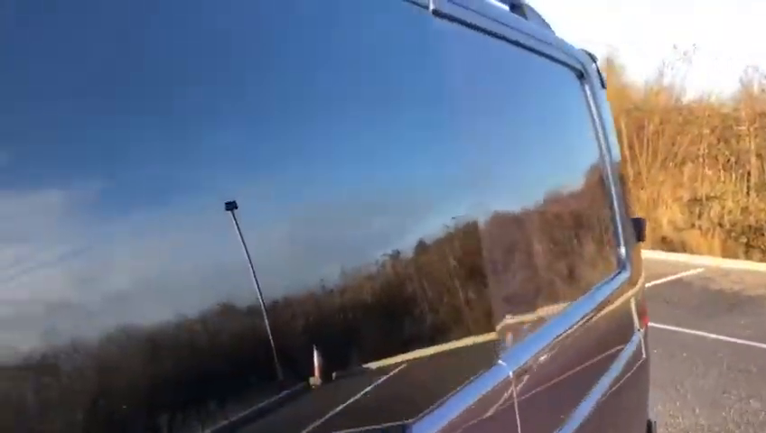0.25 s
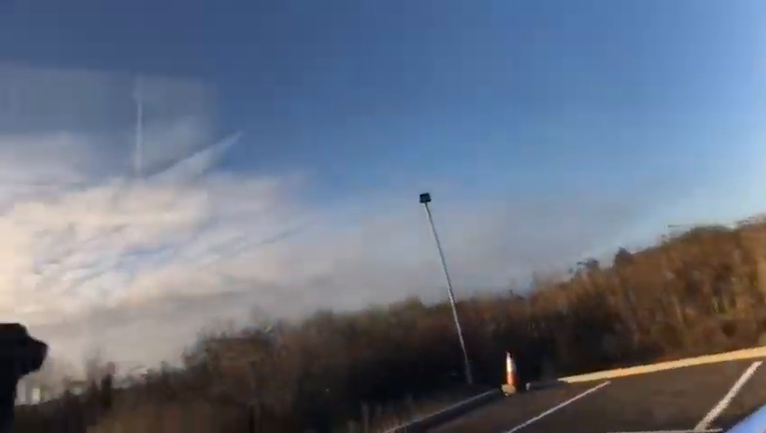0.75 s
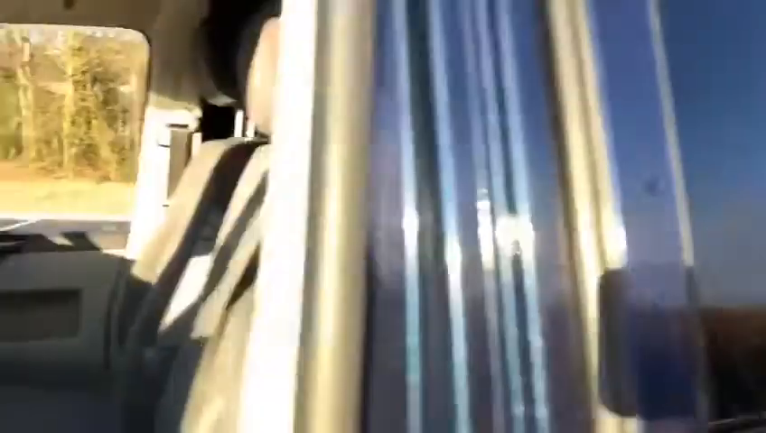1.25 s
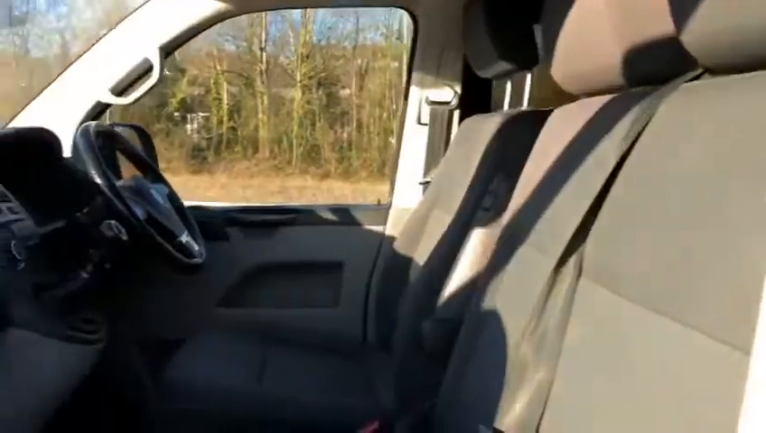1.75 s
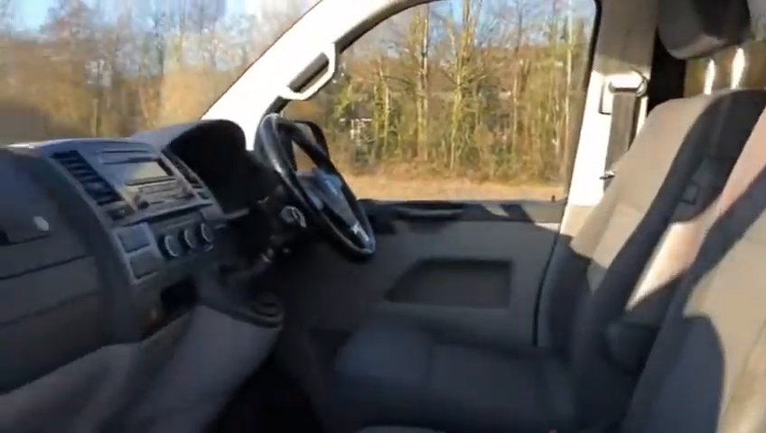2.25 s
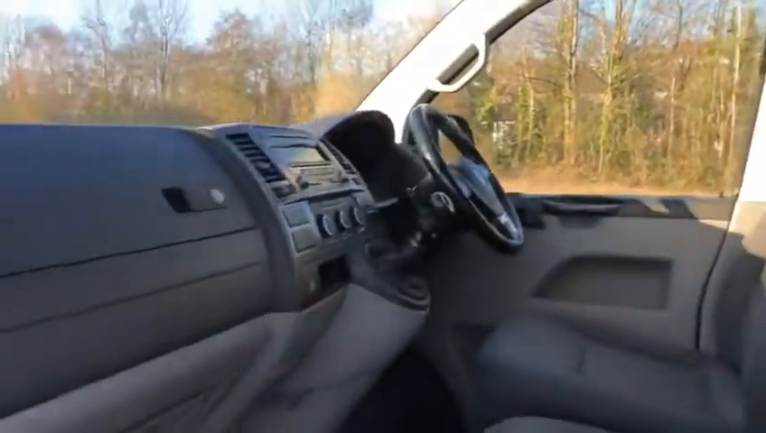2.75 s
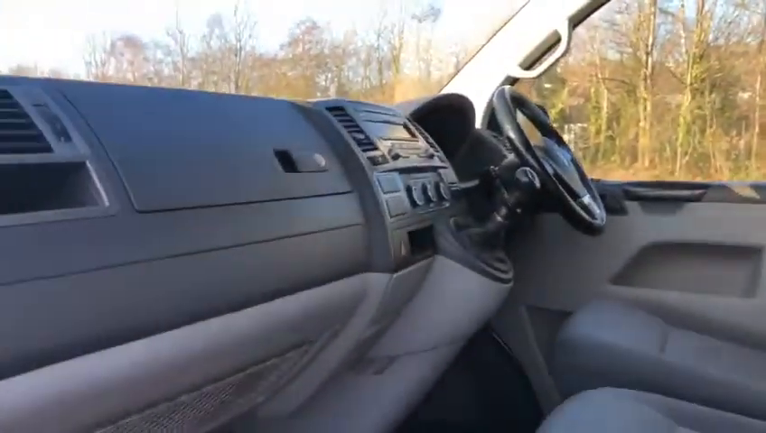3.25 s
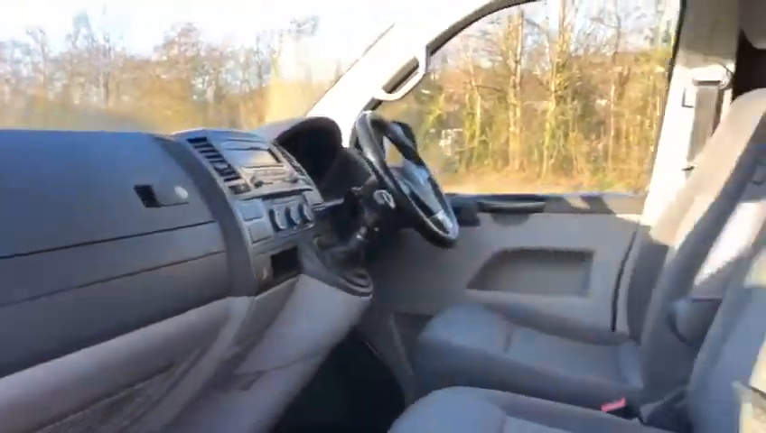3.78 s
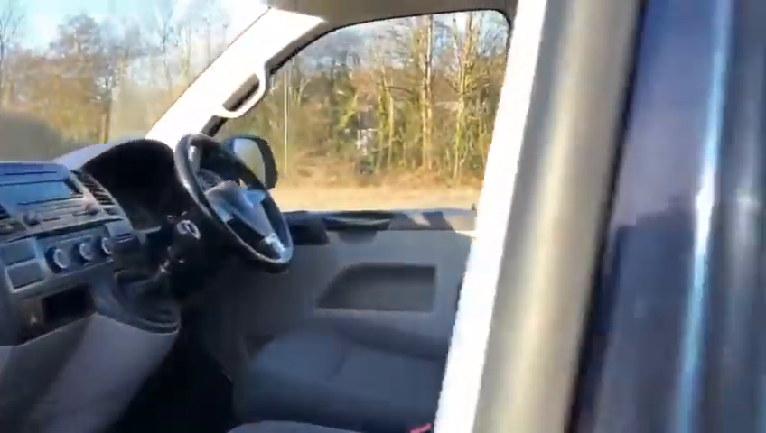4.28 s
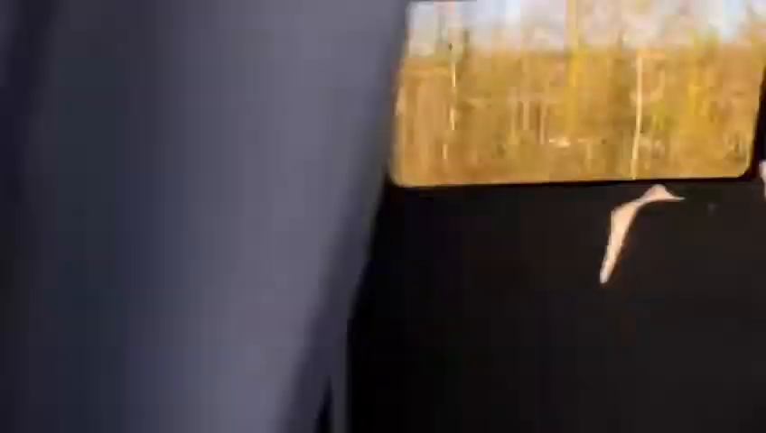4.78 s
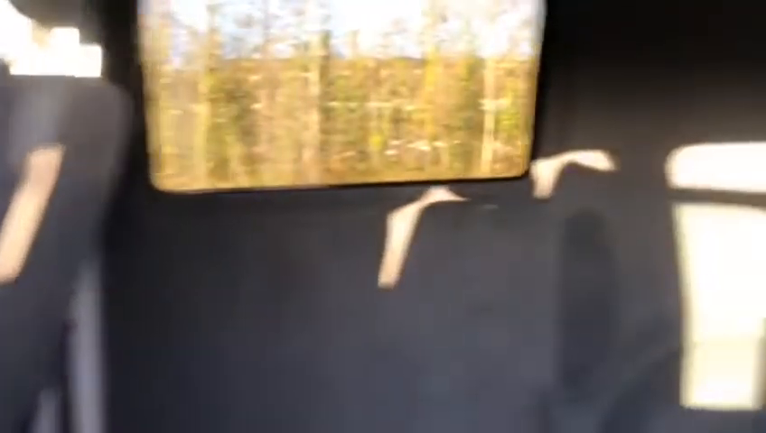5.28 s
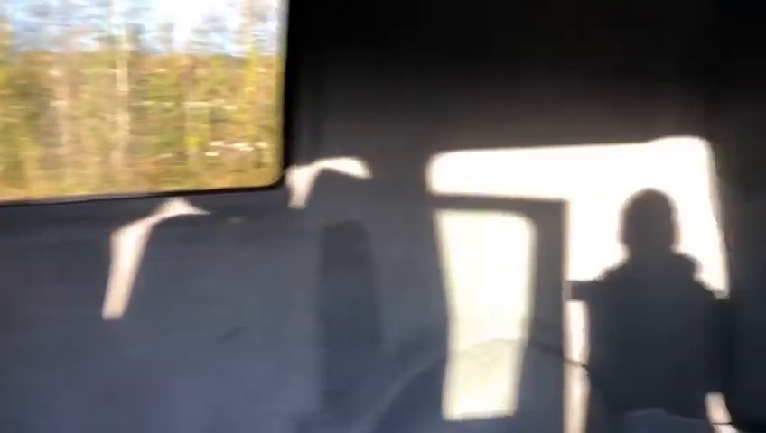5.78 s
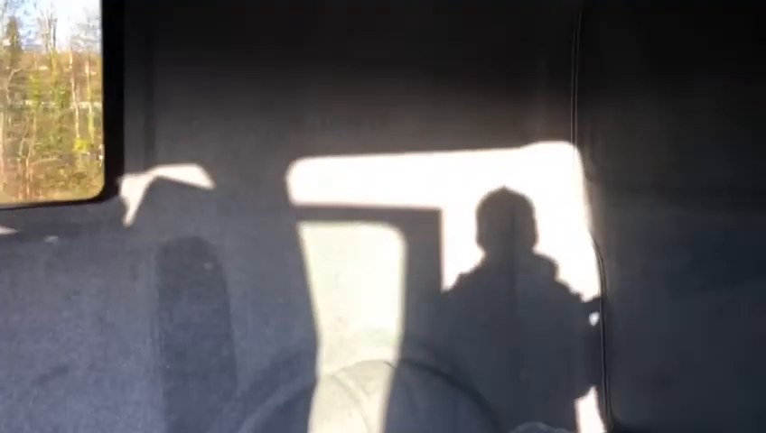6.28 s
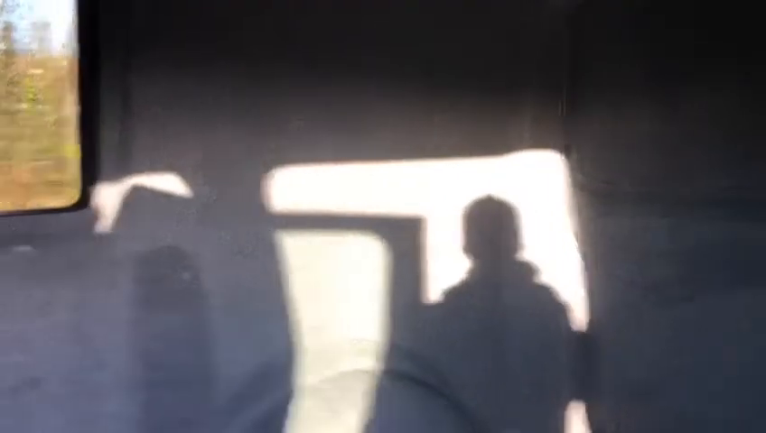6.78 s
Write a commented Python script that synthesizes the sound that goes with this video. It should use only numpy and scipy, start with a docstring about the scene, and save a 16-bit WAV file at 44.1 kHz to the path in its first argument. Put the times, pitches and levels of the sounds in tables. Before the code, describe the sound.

Close up in a quiet car park with faint traffic and breeze, a van's cab door catch cracks open with a short metallic ring. Small taps, tiny squeaks and cloth rustles follow. Then the sliding side door unlatches with a heavy multi-part clunk and rolls back, rumbling through steel and booming in the hollow body, with squeals and rattles before it slows to a stop.

```python
"""A van in a quiet car park, heard close up over shaped noise for far traffic and a light breeze.
First the cab door's catch cracks open and rings its lock and panel; light taps, dry squeals and
jacket rustles of rubbed-cloth noise follow. Then the sliding side door unlatches with a heavy clunk of
noise bursts and damped modes, and rolls back: uneven noise that follows the door's speed rumbles through
the steel and drums the hollow body, with rattles and gliding chirps, until the door slows to a stop."""
import sys
import numpy as np
from scipy import signal
from scipy.fft import rfft, irfft, next_fast_len
from scipy.io import wavfile
from scipy.ndimage import uniform_filter1d, map_coordinates

SR = 44100
rng = np.random.default_rng(int(sys.argv[2]) if len(sys.argv) > 2 else 0)


def digitize_waveform(pressure):
    """Quantize a signal to 16-bit integers and store it at the path in sys.argv[1].

    Rows of a 2-D input are taken as channels; values are limited to [-1, 1].
    """
    field = np.atleast_2d(pressure).T
    bounded = np.clip(field, -1, 1)
    quanta = np.round(bounded * 32767).astype(np.int16)
    wavfile.write(sys.argv[1], SR, quanta)


N = 310023  # length in samples

# In every table level_db is relative: the function that plays it adds its own envelope, colour and gain.


def amp(db):
    """Decibels to gain."""
    return 10 ** (np.asarray(db) / 20)


def unit(x):
    """Scale to rms 1."""
    return x / np.sqrt(np.mean(x ** 2) + 1e-20)


def along(points, hz):
    """Read (Hz, value) points on a log frequency axis."""
    f, v = np.transpose(points)
    return np.interp(np.log(hz + 1), np.log(f + 1), v)


def wobble(rate, size=N):
    """A smooth random curve with this many knots a second."""
    knots = rng.standard_normal(int(size * rate / SR) + 4)
    return map_coordinates(knots, [np.arange(size) * rate / SR])


def filtered(x, response):
    """Pass x through a response given as a function of frequency."""
    padded = next_fast_len(len(x) + SR // 4)
    spectrum = rfft(x, padded) * response(np.fft.rfftfreq(padded, 1 / SR))
    return irfft(spectrum, padded)[:len(x)]


def coloured(x, spectrum):
    """Shape x with (Hz, dB) points, at rms 1."""
    return unit(filtered(x, lambda hz: amp(along(spectrum, hz))))


def rush(spectrum):
    """Steady noise of rms 1 with this spectrum."""
    return coloured(rng.standard_normal(N), spectrum)


def bumps(rate, depth_db):
    """Uneven contact force of surfaces that roll or rub: noise whose level wanders."""
    return rng.standard_normal(N) * amp(depth_db * wobble(rate))


def add(track, s, sound):
    """Mix a sound into the track at time s."""
    part = track[max(round(s * SR), 0):][:len(sound)]
    part += sound[:len(part)]


def swells(rows, attack_s, release_s, sag_db_per_s=0):
    """A gain per sample: each (start, length, dB) row rises, holds while sagging, and dies away."""
    t = np.arange(2 * SR) / SR
    out = np.zeros(N)
    for s, length, db in rows:
        rise = np.minimum(t / attack_s, 1)
        release = np.exp(-np.maximum(t - length, 0) / release_s)
        add(out, s, amp(db - sag_db_per_s * t) * rise * release)
    return out


def ring(modes, attack, spread_db):
    """Damped (Hz, dB, t60) modes of a struck part, with levels a little different every time."""
    t = np.arange(SR // 2) / SR
    tones = 0
    for hz, db, t60 in modes:
        tones += amp(db + spread_db * rng.normal() - 60 * t / t60) * np.sin(2 * np.pi * hz * t)
    return tones * (1 - np.exp(-t / attack))


def contact(colour, decay, attack, crack_t60, tail_db):
    """A blow on a part with countless modes: a short crack and a tail, each band dying at its own speed."""
    t = np.arange(SR // 3) / SR
    out = np.zeros(len(t))
    edges_hz = [200, 400, 800, 1300, 2000, 3800, 7000, 11000]
    for low, high in zip(edges_hz, edges_hz[1:]):
        centre = np.sqrt(low * high)
        band = signal.butter(3, [low, high], "band", fs=SR, output="sos")
        crack = amp(-60 * t / crack_t60)
        tail = amp(tail_db - 60 * t / along(decay, centre))
        fade = (crack + tail) * (1 - np.exp(-t / attack))
        burst = signal.sosfilt(band, fade * rng.standard_normal(len(t)))
        # every band gets the energy of its fade, whatever its width
        out += amp(along(colour, centre)) * burst * np.linalg.norm(fade) / np.linalg.norm(burst)
    return out


def contacts(rows, voicing, decay, attack, crack_t60, tail_db):
    """A series of blows on one part; voicing gives the (Hz, dB) of its knock, clack, tick and snap."""
    out = np.zeros(N)
    for s, tick, knock, clack, snap, *_ in rows:
        levels = (knock, clack, tick, snap)
        colour = [(hz, db + level) for (hz, db), level in zip(voicing, levels)]
        add(out, s, contact(colour, decay, attack, crack_t60, tail_db))
    return out


def with_clack(rows, clack_db):
    """Give each blow its clack, set against the mean of the low knock and the bright tick."""
    return [(s, tick, knock, (tick + knock) / 2 + clack_db, snap, hz) for s, tick, knock, snap, hz in rows]


PING_LOW_RATIO = 0.47  # the dull mode of a small steel part, over its main pitch


def pings(rows, t60, low_db):
    """A small steel part rings briefly: its own pitch, a duller mode below and brighter ones above."""
    out = np.zeros(N)
    for s, tick, _, clack, snap, hz in rows:
        modes = [(PING_LOW_RATIO * hz, clack + low_db, t60), (hz, tick - 2, t60)]
        modes += [(ratio * hz, snap, t60) for ratio in (1.97, 2.6, 3.3)]
        add(out, s, ring(modes, attack=0.00047, spread_db=5.0))
    return out


# spectra of far traffic and of the breeze: pitch_hz, level_db
ROAD_COLOUR = [(35, -36), (60, 1.5), (82, -26.5), (136, -11.5), (208, -15.5), (253, -12.5), (346, -19.5),
               (897, -21), (1430, -26), (1630, -30), (1740, -32.5), (2540, -40), (12000, -55.5),
               (15600, -78), (22000, -120)]
BREEZE_COLOUR = [(15, -16), (45, 2), (70, -7), (150, -9.5), (300, -32), (800, -23), (3000, -120)]
# puffs of breeze on the microphone: start_s, length_s, level_db
PUFFS = [(.38, 0.061, -46), (.66, 0.072, -45), (1.02, 0.064, -29)]
# swells of the thin, far hiss: start_s, length_s, level_db
HISS_SWELLS = [(.35, 0.49, -64.5), (6.3, 0.56, -68.5)]
TRAFFIC_DB, BREEZE_DB, HISS_DB = -45.5, -42, -76  # base levels before the fades and swells
SHELTER_DB_PER_S, BREEZE_EASES_DB_PER_S = 0.2, 0.9  # both fade as the microphone moves into the van
OUTSIDE_DB, OUTSIDE_S = 6, 0.72  # extra road at first, out in the open, and its time constant


def outdoors():
    """Far traffic and a thin hiss as filtered noise, under a low breeze that puffs and eases off."""
    t = np.arange(N) / SR
    road_db = TRAFFIC_DB + OUTSIDE_DB * np.exp(-t / OUTSIDE_S) - SHELTER_DB_PER_S * t
    road = amp(road_db + 0.19 * wobble(5)) * rush(ROAD_COLOUR)
    thin = rush([(1500, -36), (2900, -7.5), (3500, -2.0), (4200, -9), (5000, -23), (9000, -49.0)])
    hiss = (amp(HISS_DB) + swells(HISS_SWELLS, attack_s=0.22, release_s=0.059)) * thin
    breeze = amp(BREEZE_DB - BREEZE_EASES_DB_PER_S * t)
    breeze += swells(PUFFS, attack_s=0.052, release_s=0.11)
    return road + hiss + breeze * rush(BREEZE_COLOUR)


# sleeve movements: start_s, length_s, level_db
SLEEVES = [(1.04, 0.18, -53), (2.58, 0.14, -56.5), (2.66, 0.45, -55), (3.52, 0.23, -53), (4.2, 0.065, -57),
           (6.35, 0.096, -54), (6.5, 0.2, -62.5)]
# spectrum of rubbed cloth: pitch_hz, level_db
CLOTH_COLOUR = [(300, 5), (1200, 3), (2800, -2.5), (4500, -7.5), (9000, -14), (12000, -12)]


def jacket():
    """Sleeves brush against the coat: uneven friction noise swells at each movement."""
    rub = swells(SLEEVES, attack_s=0.038, release_s=0.03, sag_db_per_s=3)
    return amp(5.0) * rub * coloured(bumps(400, 1.2), CLOTH_COLOUR)


# hinge, handle and small knocks of hands on the van: start_s, tick_db, knock_db, snap_db, ring_hz
TAP_BLOWS = [(0.2144, -38, -55, -58, 2530), (0.403, -29, -43, -47.5, 2570), (0.4264, -31.5, -51, -54, 2560),
             (0.443, -28, -39, -45, 2050), (0.4562, -24.5, -60, -49.5, 3470),
             (0.473, -19.5, -43, -52, 2880), (0.735, -32.5, -40, -68, 1760), (1.2445, -37, -40, -52, 4800),
             (1.5855, -42.5, -35, -60, 1910), (1.6441, -26.5, -52, -57, 2300),
             (2.0658, -35.5, -52, -62.5, 2970), (2.5125, -39, -34.5, -54.5, 2930),
             (2.546, -31, -35, -59, 1940), (3.217, -40, -36.5, -54, 1940), (3.2552, -41.5, -46, -53, 1820),
             (3.2684, -39, -41, -48.5, 2890), (3.4692, -31, -29, -47, 1870), (3.5118, -37, -30, -62, 2600),
             (3.5499, -29, -23, -55, 1830), (3.8669, -45, -32.5, -49, 2050), (3.906, -39, -23, -52, 2180)]


def taps():
    """Light, dry contacts around the doors: a short noise click and a small steel ping each."""
    blows = with_clack(TAP_BLOWS, clack_db=-7)
    clicks = contacts(blows, [(450, -1.5), (1200, 0.0), (3000, -11), (8000, -0.5)],
                      [(300, 0.22), (2000, 0.11), (9000, 0.13)],
                      attack=0.0004, crack_t60=0.011, tail_db=-6)
    return clicks + amp(-2.5) * pings(blows, t60=0.021, low_db=4)


# cab door catch, blow by blow: start_s, tick_db, knock_db, clack_db, snap_db
CATCH_BLOWS = [(0.0446, -8, -12.5, -21, -32), (0.0468, -12, -13.5, -22, -20), (0.0595, -22, -34, -33, -35),
               (0.1192, -22.5, -20, -19.5, -48), (0.148, -21.5, -25.5, -28, -22.5)]
# modes of its lock, then of its panel: pitch_hz, level_db, t60_s
LOCK_MODES = [(1780, -16, 0.05), (1960, -7, 0.06), (2200, -5, 0.072), (2660, -3, 0.045), (2870, -3, 0.043),
              (2995, -0.5, 0.044), (3520, -13, 0.052), (5350, -9, 0.045), (5580, -12, .04),
              (7160, -13, .04)]
CAB_PANEL_MODES = [(46.8, -10.5, 0.53), (89.5, -8, 0.13), (153, -6, 0.12), (333, 6.5, 0.025),
                   (486, 1.5, 0.045), (623, 8, 0.031), (787, -8, .04)]
CAB_JOLT_S = 0.0489  # when the freed door jolts


def cab_door():
    """The catch springs open with a crack; its first blow rings the lock, then the freed door jolts."""
    out = contacts(CATCH_BLOWS, [(550, 0.5), (1200, -5.5), (2800, -6), (8000, -13)],
                   [(300, 0.19), (2000, 0.12), (9000, 0.054)],
                   attack=0.00098, crack_t60=0.018, tail_db=-14.5)
    crack = contact([(500, -16), (1300, -22), (2800, -12.5), (8500, -32)], [(1000, 0.0061)],
                    attack=0.00027, crack_t60=0.006, tail_db=-27)
    add(out, CATCH_BLOWS[1][0], crack)
    add(out, CATCH_BLOWS[0][0], amp(-17.5) * ring(LOCK_MODES, attack=0.00065, spread_db=0.5))
    add(out, CAB_JOLT_S, amp(-10.0) * ring(CAB_PANEL_MODES, attack=0.0009, spread_db=2.5))
    return out


# dry hinges and rollers stick and slip: start_s, length_s, pitch_hz, level_db, roughness (0 = smooth)
SQUEALS = [(0.411, 0.034, 346, -33.5, 0.3), (0.725, 0.033, 2110, -43.5, 0.6),
           (1.131, 0.073, 1676, -42, 1.34), (2.773, 0.047, 3320, -52, 0.15), (3.251, 0.045, 2990, -51, 0.5),
           (3.242, 0.055, 6020, -56, 0.1), (4.638, 0.16, 1840, -26.5, 0.49),
           (4.66, 0.041, 1875, -19.5, 0.1), (4.726, 0.044, 1566, -26, 0.1), (4.662, 0.3, 3200, -43, 0.91),
           (4.808, 0.057, 1870, -29, 0.37), (4.889, 0.052, 1678, -29, 0.7), (5.805, 0.06, 8850, -51, 0.3),
           (5.817, 0.056, 3940, -47, .4), (5.838, 0.064, 2480, -38.5, 0.63),
           (5.839, 0.032, 10170, -34.5, .2)]
CHIRP_SAG = 0.0247  # a squeal glides down by this share of its pitch


def chirps():
    """Stick-slip squeals with a weak octave; rough ones stutter and wander in pitch."""
    out = np.zeros(N)
    for s, length, pitch_hz, db, rough in SQUEALS:
        n = int(length * SR)
        glide = 1 + CHIRP_SAG * np.linspace(0.5, -0.5, n)
        hz = pitch_hz * glide + rough * 270 * wobble(895, size=n)
        phase = 2 * np.pi * np.cumsum(hz) / SR
        stutter = amp((1 + 2 * rough) * wobble(250, size=n))
        swell = np.sin(np.pi * np.arange(n) / n) * stutter
        add(out, s, amp(db) * swell * (np.sin(phase) + amp(-14) * np.sin(2 * phase)))
    return out


def resonances(modes, f):
    """Band-pass response of each (Hz, width Hz, dB) mode."""
    return [amp(db) * 1j * f * w / (c * c - f * f + 1j * f * w) for c, w, db in modes]


# resonances of the sliding door's steel frame and track: pitch_hz, width_hz, level_db
STEEL_MODES = [(360, 5.7, -9), (429.7, 6.9, -6), (509, 11, -4.5), (737, 7.6, -5.5), (959, 7, 4.5),
               (1004, 9, -1.5), (1140, 6.5, -10.5), (1388, 9, -5), (1503, 15, -2.5), (1600, 51, -6),
               (1883, 7.7, -1.5), (2560, 6.2, -4.5), (2818, 13, 3.5), (3180, 38, 3), (3820, 35, -19.5)]


def frame(x, direct_db):
    """Sound carried by the door's steel, which rings on at its resonances."""
    return filtered(x, lambda f: amp(direct_db) * (1 + sum(resonances(STEEL_MODES, f))))


# slow swings of the sliding door's skin: pitch_hz, level_db, t60_s
SKIN_MODES = [(40.3, 0, 0.2), (73, -0.5, .17), (113, -8, 0.36), (130.7, -7, 0.26), (184, -14, 0.17),
              (249, -8, 0.11), (300, 1, 0.089), (358, -7, 0.13), (475, -24, 0.12)]


def door_skin(attack, spread_db):
    """The sliding door's sheet metal, jolted once, swings at its low modes."""
    return ring(SKIN_MODES, attack, spread_db)


# sliding door latch and stays: start_s, tick_db, knock_db, clack_db, snap_db, shove_db (on the panel)
LATCH_BLOWS = [(3.6634, -28, -18, -14, -27, -30), (3.6673, -16, -10, -27, -15.5, -29),
               (3.678, -26, -13.5, -11.5, -48, -5.5), (3.699, -47, -43, -9.5, -53, -8.5),
               (3.7233, -36, -7.5, -19.5, -40, -11.5), (3.7329, -44, -11, -26, -44, -26),
               (3.7492, -39, -15.5, -47, -25.5, -10.5), (3.772, -40, -28, -29, -41, -15.5)]
# modes of the arms that carry the door: pitch_hz, level_db, t60_s
STAY_MODES = [(390, -1.5, 0.063), (501, -4, 0.053), (680, -5.5, .045), (965, -2.5, 0.04),
              (1150, -9.5, 0.032), (1720, -6, .035)]
LATCH_DULL_HZ = 10300  # the door's trim muffles the latch above this


def unlatch():
    """The latch snaps, then the heavy door jumps out of its seal and clanks on its stays."""
    blows = contacts(LATCH_BLOWS, [(450, -2), (1200, -2.5), (3200, -0.5), (8000, -3.5)],
                     [(300, 0.3), (1500, 0.13), (9000, 0.093)],
                     attack=0.0014, crack_t60=0.027, tail_db=-9.5)
    # steel meets steel for a moment as the claw lets go
    crack = contact([(500, -22), (2000, -3.0), (3500, -7.5), (8500, -12)], [(1000, 0.0047)],
                    attack=0.0001, crack_t60=0.0026, tail_db=-33)
    add(blows, 3.6686, crack)
    carried = frame(blows, direct_db=-1.5)
    out = filtered(carried, lambda hz: 1 / np.sqrt(1 + (hz / LATCH_DULL_HZ) ** 20))
    for s, _, knock_db, _, _, shove_db in LATCH_BLOWS:
        add(out, s, amp(knock_db - 5) * ring(STAY_MODES, attack=0.0012, spread_db=2.0))
        add(out, s, amp(shove_db) * door_skin(attack=0.0022, spread_db=2.0))
    return out


# the sliding door's speed along its track: time_s, share_of_top_speed
SPEED_POINTS = [(3.78, 0.2), (3.86, 0.24), (4.0, 0.32), (4.2, 0.7), (4.5, 0.64), (4.75, 1), (5.1, 0.63),
                (5.5, 0.73), (6.1, 0.3), (6.29, 0)]


def door_speed():
    """The door's speed at each sample, as a share of its top speed."""
    s, speed = np.transpose(SPEED_POINTS)
    return np.interp(np.arange(N) / SR, s, np.maximum(speed, 0), left=0, right=0)


# resonances of the air in the load space: pitch_hz, width_hz, level_db
CAVITY_MODES = [(82, 17, -13.5), (114.9, 5.7, 2), (131.9, 12.6, -5.5), (248.5, 8.9, -14.5)]
# booms of the load space as the door lurches: start_s, level_db
LURCHES = [(4.17, -31), (4.85, -22.5), (5.35, -27.5), (5.66, -22), (5.97, -26.5)]
# the door swings on its arms, out of the opening and into the stop: start_s, length_s, level_db
ARM_SWINGS = [(3.8, .16, -29.5), (4.2, 0.19, -31), (5.72, 0.37, -29)]
LURCH_S = 0.052  # length of a lurch before its release
DRUM_DB, SWAY_DB = -25.5, -42  # at top speed, before the opening gain
OPENING_DB = 8.5  # the load space drums this much louder with the door fully open


def hollow_body():
    """The hanging door sways and makes the load space drum, louder with speed and as the gap widens."""
    speed = door_speed()
    opening = np.cumsum(speed) / np.sum(speed)

    def cavity(f):
        """Air modes of alternating sign, with the treble rolled off."""
        modes = sum((-1) ** k * r for k, r in enumerate(resonances(CAVITY_MODES, f)))
        return modes / (1 + (f / 400) ** 2)

    drum = filtered(bumps(60, 0.39), cavity)
    # an even push feeds it even power
    drum /= np.sqrt(np.abs(uniform_filter1d(drum ** 2, size=SR // 10)) + 1e-12)
    push = amp(DRUM_DB + OPENING_DB * opening) * speed ** 1.7
    push += swells([(s, LURCH_S, db) for s, db in LURCHES], attack_s=0.065, release_s=0.11)
    swing = amp(SWAY_DB) * speed + swells(ARM_SWINGS, attack_s=0.03, release_s=0.22)
    return push * drum + swing * rush([(15, 2), (35, 21), (60, 12), (85, 20.0), (130, -44)])


# dry stretches of the track: start_s, length_s, scrape_db, chatter_db
DRY_STRETCHES = [(4.547, 0.46, -32, -35.5), (5.762, .34, -44, -40.5)]
CHATTER_PER_S, CHATTER_T60_S = 97, 0.053
CHATTER_HZ, CHATTER_OCTAVES = 1495, 0.743  # middle pitch, and half its widest spread to either side


def chatter():
    """On dry stretches the loose rollers clink against the track at random, each a damped sine."""
    out, t = np.zeros(N), np.arange(SR // 12) / SR
    for s, length, _, db in DRY_STRETCHES:
        clinks = rng.random((int(length * CHATTER_PER_S), 4))
        for when, size, u, v in clinks:
            hz = CHATTER_HZ * 2 ** (2 * CHATTER_OCTAVES * (u - v))
            fade = amp(db + 5.4 * (size - 0.5) - 60 * t / CHATTER_T60_S) * (1 - np.exp(-t / 0.0006))
            # higher clinks are weaker
            add(out, s + when * length, fade * np.sin(2 * np.pi * hz * t) * np.sqrt(CHATTER_HZ / hz))
    return out


# rollers and guide knocking in the track: start_s, tick_db, knock_db, snap_db, ring_hz
TRACK_KNOCKS = [(4.1059, -40.5, -28.5, -52.5, 2460), (4.2155, -32, -33, -51, 2240),
                (4.2734, -21.5, -23.5, -39.5, 1990), (4.5188, -31.5, -28, -58, 1880),
                (4.5858, -32, -29, -44, 1900), (4.7758, -18, -18, -44, 2130), (5.1008, -35, -44, -47, 2770),
                (5.665, -38, -36, -44, 2680), (5.7264, -34, -48, -55, 3700), (5.7935, -28, -31, -34, 2110),
                (5.8823, -25, -42, -45, 1770), (5.917, -31.5, -21.5, -25, 2280),
                (5.9698, -34.5, -21, -48, 2360), (6.0118, -26, -23, -51, 2370),
                (6.0423, -28, -26, -46, 2400), (6.095, -28, -44, -67, 1880)]
# spectra of the rollers' rumble and of their scrape: pitch_hz, level_db
RUMBLE_COLOUR = [(88, -48), (150, -3.5), (172, -3.5), (224, 0), (322, -6.5), (414, -6.5), (539, -10),
                 (581, -16), (634, -17), (867, -23.5), (1100, -28), (1310, -32.5), (3000, -48.5),
                 (3900, -49.5), (6600, -120)]
SCRAPE_COLOUR = [(410, -25), (700, 6), (761, 12.5), (1150, -11), (1210, 7), (1360, -6.5), (1880, 1.5),
                 (2240, -9), (3060, -8.5), (4420, -15), (8700, -17.5), (10800, -24.5), (12000, -24),
                 (15600, -79), (22000, -120)]
RUMBLE_DB, SCRAPE_DB = -22.5, -44  # at top speed, before the steel frame


def rolling():
    """Rollers rumble and scrape with speed, scraping harder on dry track; knocks jolt the door's skin."""
    speed = door_speed()
    blows = with_clack(TRACK_KNOCKS, clack_db=-6.5)
    rumble = amp(RUMBLE_DB) * speed * coloured(bumps(60, 2.2), RUMBLE_COLOUR)
    dry_parts = [(s, length, db) for s, length, db, _ in DRY_STRETCHES]
    friction = amp(SCRAPE_DB) * speed ** 1.52
    friction += swells(dry_parts, attack_s=0.14, release_s=0.038, sag_db_per_s=23)
    scrape = friction * coloured(bumps(200, 3.0), SCRAPE_COLOUR)
    knocks = contacts(blows, [(600, -2.0), (1200, 1.0), (3000, -9.0), (8000, 2.0)],
                      [(300, 0.17), (2000, 0.13), (9000, 0.043)],
                      attack=0.0012, crack_t60=0.0094, tail_db=-5)
    out = frame(rumble + scrape + knocks, direct_db=-1.0)
    out += amp(-9.5) * pings(blows, t60=0.035, low_db=2)
    for s, _, knock_db, *_ in blows:
        add(out, s, amp(knock_db - 6) * door_skin(attack=0.0034, spread_db=1.5))
    return out


def scene():
    """Everything at one microphone, from the background to the sliding door."""
    background = outdoors() + jacket() + taps()
    sliding_door = unlatch() + hollow_body() + chatter() + rolling()
    return (background + cab_door() + chirps() + sliding_door)[None]


TOP_HZ = 11500  # the recorder's band limit


def record(dry):
    """The recorder rounds off the highest peaks and cuts steeply above its band limit."""
    held = dry[0] / (1 + np.abs(dry[0] / 0.92) ** 6) ** (1 / 6)
    return filtered(held, lambda hz: 1 / (1 + (hz / TOP_HZ) ** 80))[None]


dry = scene()
out = record(dry)
digitize_waveform(out)
```